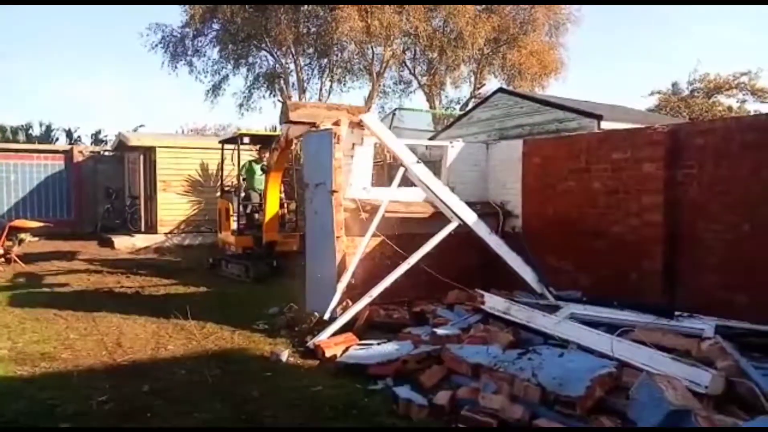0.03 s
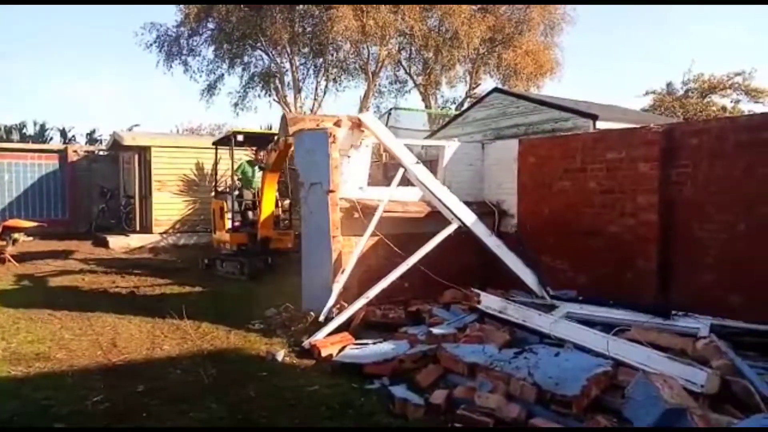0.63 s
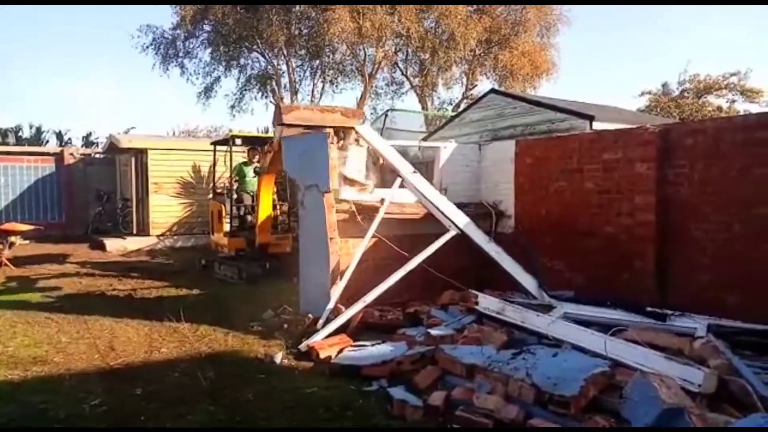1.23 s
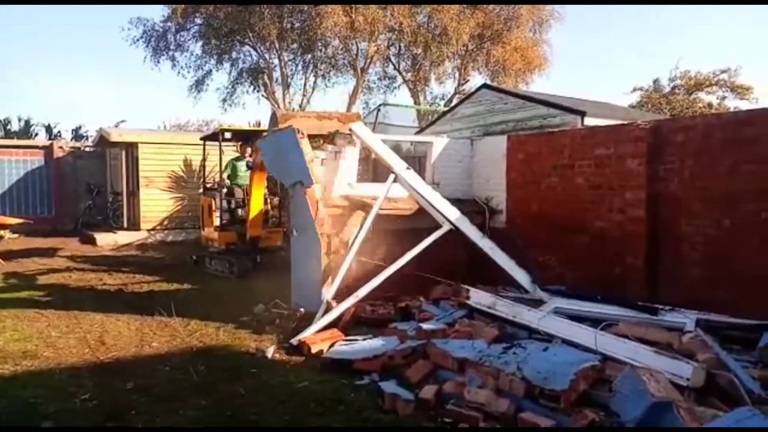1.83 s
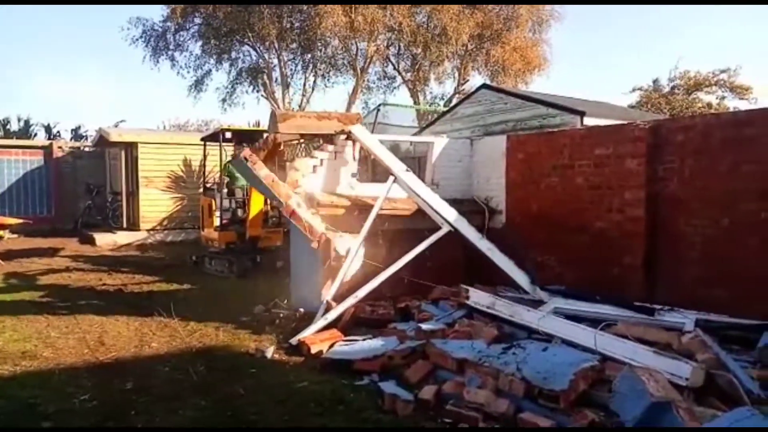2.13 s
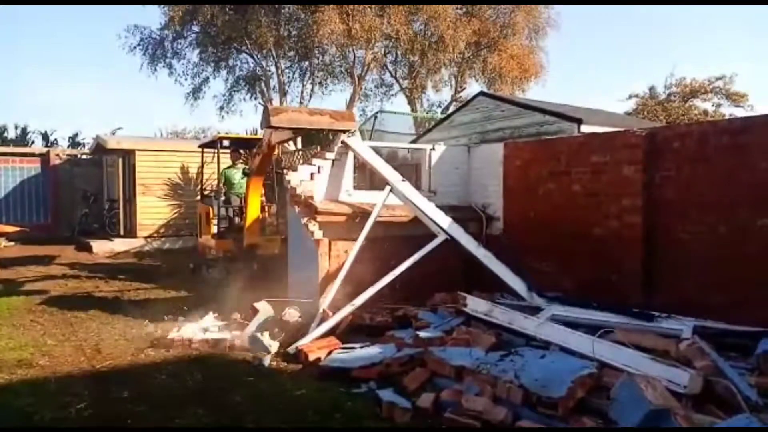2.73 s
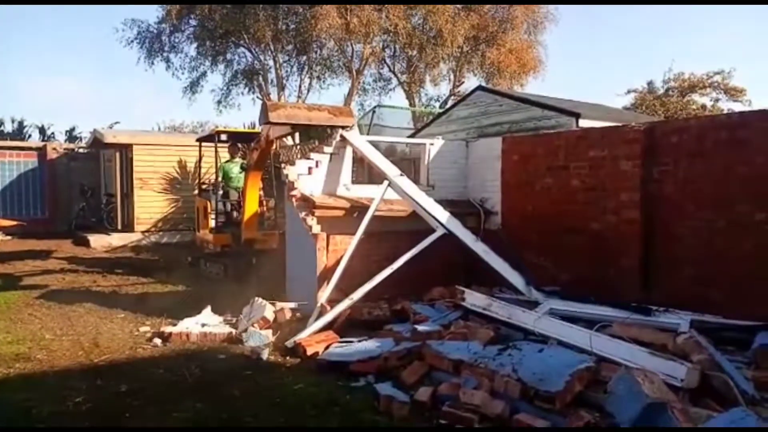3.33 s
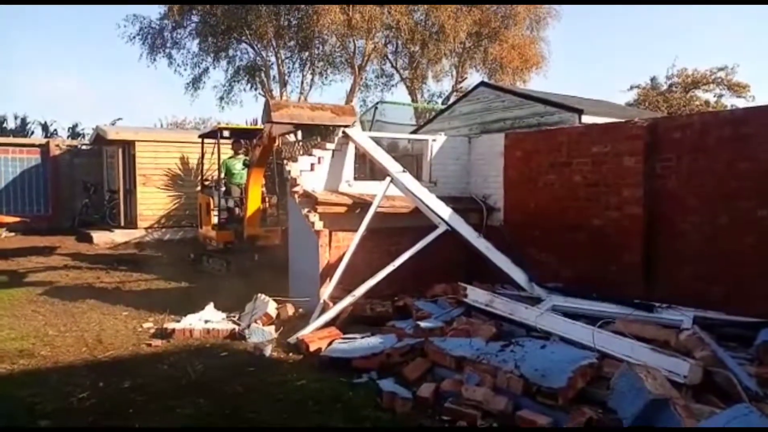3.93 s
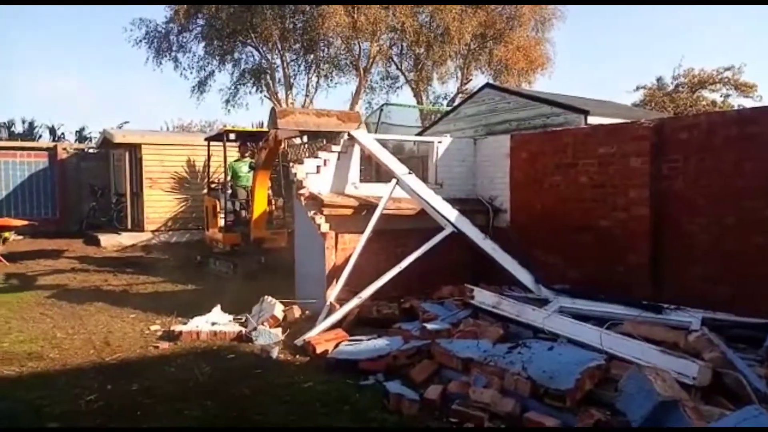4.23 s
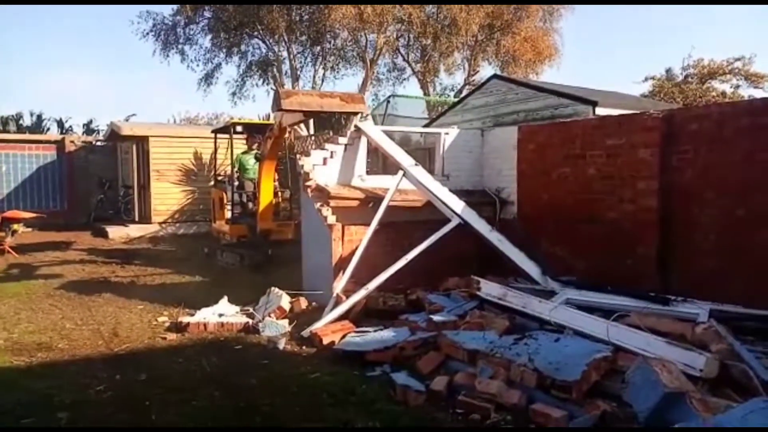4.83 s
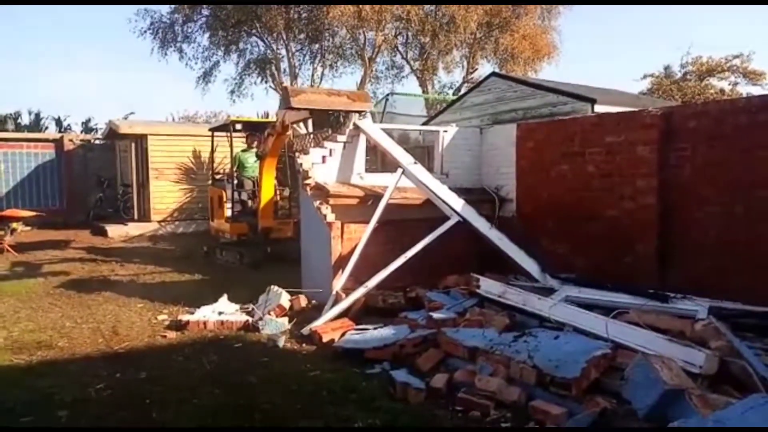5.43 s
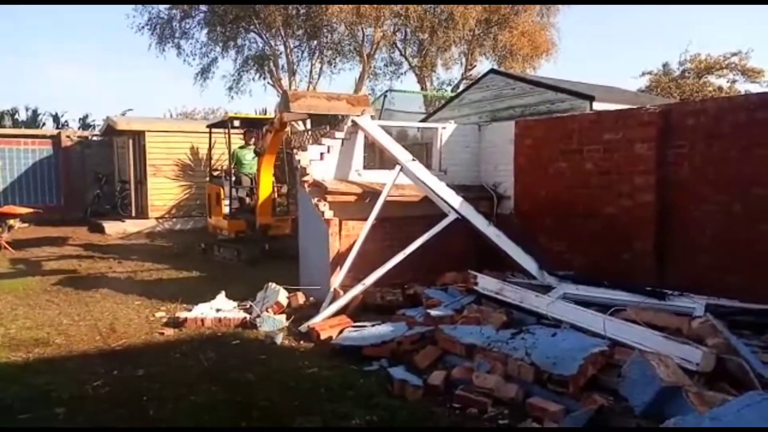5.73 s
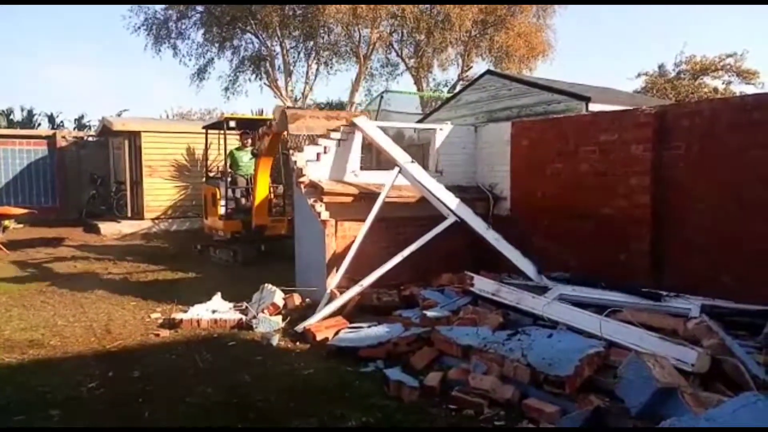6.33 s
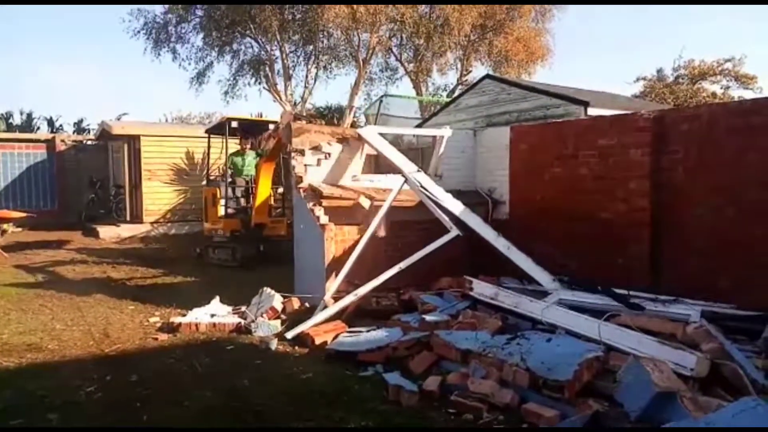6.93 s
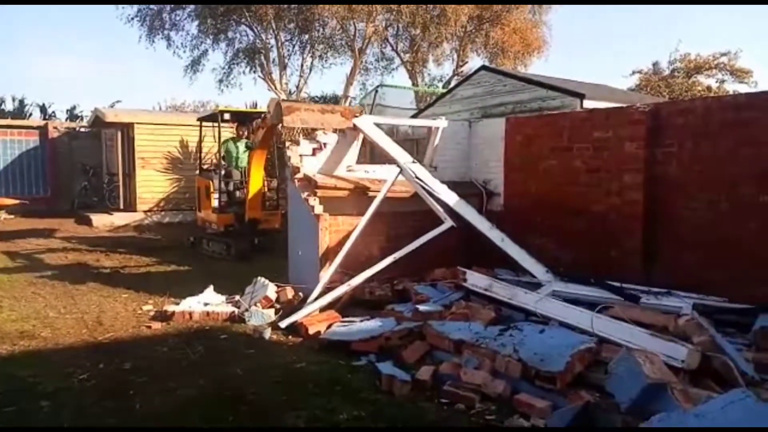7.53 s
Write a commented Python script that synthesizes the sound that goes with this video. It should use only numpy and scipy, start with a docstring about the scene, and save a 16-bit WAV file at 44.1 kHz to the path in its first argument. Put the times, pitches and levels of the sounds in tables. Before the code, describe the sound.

In a walled garden, masonry crunches and snaps under the blows of a small digger, its steel boom ringing faintly. Bricks clatter down and heavy pieces thump on the grass. For a few seconds only the chugging diesel remains, then a second round of knocks and falling brick begins. A phone picks it up from several metres off, stronger on the left, with a brief echo.

```python
"""A brick wall breaks under a mini digger's bucket, in a walled garden some metres from a phone.
The bucket knocks and grinds on the masonry and its steel boom rings; bricks crack, clink and tumble,
slabs thud on the lawn and mortar trickles down. The three-cylinder diesel chugs on through a pause,
slower and louder whenever the arm pulls; then the bucket bites again. Walls and sheds give a short
echo, and the phone's microphones hear it all louder on the left."""
import sys
import numpy as np
from scipy import signal
from scipy.fft import rfft, irfft
from scipy.io import wavfile
from scipy.ndimage import uniform_filter1d

SR = 44100
rng = np.random.default_rng(int(sys.argv[2]) if len(sys.argv) > 2 else 0)


def dump_mix(stems):
    """Bounce the given channels to the path in sys.argv[1] as a 16-bit WAV at rate SR."""
    frames = np.atleast_2d(stems).T  # one column per channel
    limited = np.clip(frames, -1, 1)  # hard clip at full scale
    pcm = np.round(limited * 32767).astype(np.int16)
    wavfile.write(sys.argv[1], SR, pcm)


N = 339570
TIME = np.arange(N) / SR


# bucket and slabs striking masonry, some metres off:
# (time [s], knock level [dB], thump level [dB], body level [dB], crunch level [dB], t60 [s])
BLOWS = [(0.113, -12, -39, -42, -44.5, 1), (0.486, -3, -24.5, -23, -25.5, 0.29),
         (1.024, -33, -61, -33, -38, 0.1), (1.143, -13.5, -25.5, -17, -23.5, 0.2),
         (1.402, -16, -23, -23, -22.5, 0.31), (1.507, -12, -32, -26, -26, 0.21),
         (1.715, -15, -28.5, -27.5, -27, 0.11), (1.807, -2.5, -29, -27, -33, 0.32),
         (2.333, -11, -27, -18.5, -32, 0.088), (2.389, -13, -31, -28.5, -33, 0.22),
         (2.420, -6, -24, -27.5, -46, 0.32), (2.595, -20, -28, -29, -25.5, 0.4),
         (2.635, -9.5, -23, -24.5, -37.5, 0.18), (3.541, -19, -50, -37.5, -57, 0.13),
         (6.426, -29, -54, -34.5, -54, 0.35), (6.451, -24, -32, -29, -24.5, 0.26),
         (6.49, -5, -31, -41, -28, 0.54), (6.633, -9.5, -35, -30, -43, 0.34),
         (6.743, -15.5, -36, -41, -34, 0.14), (6.858, -15, -50, -49, -41, 0.27),
         (6.987, -14, -30, -43, -32.5, 0.19), (7.059, -9, -47, -37, -33, 0.17),
         (7.255, -8, -33, -27.5, -31.5, 0.13), (7.402, -9, -31, -27.5, -47, 0.088),
         (7.68, -11, -29, -28, -32, 0.28)]
# bucket and wall resonances, low body and higher crunch: (frequency [Hz], width [Hz], level [dB])
BODY_MODES = [(322, 63, 5.5), (439, 27, 8), (593, 41, 9), (760, 74, 5), (832, 19, 0.5)]
CRUNCH_MODES = [(935, 61, 16.3), (1047, 180, 14.7), (1410, 320, 9.5), (1785, 280, 6.4), (2100, 480, 2)]

def bucket_blows(rise_s=0.0041, thump_db=-1, knock_db=-5, size=32768):
    """Each blow is one hard knock and a quick run of crushing contacts that shake wall and bucket."""
    out, t = np.zeros((2, N)), np.arange(size) / SR
    thump_modes = [(113.4, 40, 0), (217, 85, 0)]
    onset = SR // 25  # the first 40 ms set each level
    for s, knock, thump, body, crunch, t60 in BLOWS:
        knock_hz = 700 * 2 ** rng.uniform(-0.395, 0.34)
        add(out, s, undb(knock + knock_db) * chip(knock_hz, t60=0.1, ring=0.33))
        force = stereo_noise(size) * jagged(size, spread_db=2, per_s=440) * strike(t, t60, rise_s)
        for db, modes in ((thump + thump_db, thump_modes), (body, BODY_MODES), (crunch, CRUNCH_MODES)):
            shake = resonate(force, modes)
            add(out, s, undb(db) * shake / np.sqrt(np.mean(shake[:, :onset] ** 2)))
    return out


# the loudest bricks snapping in the wall: (time [s], level [dB], centre [Hz], half the crumbs' t60 [s])
CRACKS = [(0.050, -23, 4630, 0.011), (0.108, -21, 3000, 0.022), (0.115, -11, 2120, 0.015),
          (0.298, -23, 4400, 0.03), (0.3475, -20, 3800, 0.027), (0.509, -16.5, 3330, 0.031),
          (0.645, -17, 5960, 0.035), (0.778, -22, 2320, 0.031), (0.866, -19, 3110, 0.057),
          (0.928, -23, 5270, .03), (1.029, -17, 5370, 0.054), (1.320, -10.5, 5550, 0.051),
          (1.416, -19, 4450, 0.047), (1.486, -14, 6200, 0.097), (1.574, -17.5, 2900, 0.063),
          (1.604, -13.5, 4970, 0.04), (1.686, -23, 4550, 0.027), (1.778, -20.5, 2760, 0.2),
          (1.808, -15.5, 3000, 0.053), (1.848, -16, 3200, .03), (2.108, -14, 5130, 0.033),
          (2.159, -20, 2600, 0.018), (2.390, -18.5, 3120, 0.1), (2.511, -7.5, 6400, 0.012),
          (2.580, -18, 3800, .012), (2.595, -12.5, 4740, 0.098), (2.627, -10, 2220, 0.025),
          (2.708, -13, 3140, 0.0057), (2.742, -23, 4440, 0.029), (2.916, -19.5, 3170, 0.011),
          (2.958, -19.5, 3630, 0.042), (3.061, -26, 3500, 0.026), (3.148, -18.5, 6400, 0.014),
          (3.366, -20, 1880, 0.074), (3.472, -9.5, 2910, 0.011), (3.579, -18.5, 3840, 0.0091),
          (3.620, -24.5, 1510, 0.019), (3.776, -23, 3160, 0.051), (6.455, -14.5, 2200, 0.53),
          (6.516, -18, 2740, 0.15), (6.580, -6, 3060, 0.04), (6.602, -10, 3570, 0.037),
          (6.636, -13, 2630, 0.062), (6.783, -27, 4140, 0.026), (6.876, -32, 3500, 0.035),
          (6.977, -18, 2360, 0.074), (7.030, -14.5, 2950, 0.025), (7.055, -10.5, 4230, 0.035),
          (7.089, -16.5, 4450, 0.029), (7.221, -14.5, 3090, 0.046), (7.263, -13, 3450, 0.014),
          (7.393, -16.5, 2340, 0.094), (7.478, -23.5, 5600, 0.017), (7.638, -22.5, 4500, 0.022),
          (7.684, -18, 2140, 0.062)]

def brick_cracks(lesser, crumble_db=-6, snap_t60=0.012):
    """Each brick, loud or lesser, snaps and sheds a short spray of crumbs."""
    out = np.zeros((2, N))
    for s, db, hz, half_t60 in list(CRACKS) + lesser:
        add(out, s, undb(db) * chip(hz, snap_t60, ring=0.16, rise_s=0.00096))
        crumbs = chip(hz, 2 * half_t60, ring=0.33, rise_s=0.0049, size=8192)
        add(out, s, undb(db + crumble_db) * crumbs * jagged(crumbs.shape[1], spread_db=6, per_s=930))
    return out


def lesser_cracks(grit, count=130, per_s=14, over_grit_db=9.5, scatter_db=2, low_hz=1980, high_hz=6580):
    """Rows like CRACKS: bricks snap at random, following the strength of the running grit."""
    gap, size, pitch = rng.random((count, 3)).T
    times = np.cumsum(2 * gap / per_s)
    grit_db = 20 * np.log10(np.interp(times, TIME, grit) + 1e-9)
    levels = grit_db + over_grit_db + scatter_db * (2 * size - 1)
    centres = low_hz * (high_hz / low_hz) ** pitch
    return [(s, db, hz, 0.015) for s, db, hz in zip(times, levels, centres)]


# whole bricks landing on the heap; the first row is a knock already dying away as the scene opens: (time [s],
# level [dB], pitch [Hz], t60 [s])
LANDINGS = [(0.0, -15, 602, 0.03), (0.750, -25, 567, 0.08), (1.126, -42, 604, 0.056),
            (1.195, -41, 446, 0.3), (1.445, -21, 846, 0.082), (1.470, -20.5, 440, 0.055),
            (1.507, -14, 447, 0.054), (1.606, -19.5, 638, 0.08), (1.842, -26, 780, 0.22),
            (1.900, -17, 658, 0.11), (2.023, -25, 757, 0.12), (2.157, -20.5, 934, 0.043),
            (2.205, -20, 632, 0.047), (2.234, -23, 481, 0.21), (2.272, -23.5, 634, 0.13),
            (2.334, -24, 572, 0.15), (2.428, -14, 580, 0.062), (2.516, -25, 703, .06),
            (2.594, -14, 560, 0.05), (2.675, -24, 520, 0.057), (2.708, -23.5, 427, .06),
            (2.740, -27, 483, .05), (2.785, -22, 720, 0.051), (2.940, -22, 440, 0.042),
            (3.290, -38, 583, 0.099), (6.428, -24, 490, 0.081), (6.458, -31, 570, .07),
            (6.492, -25, 970, 0.077), (6.530, -28, 527, 0.083), (6.645, -35, 544, 0.088),
            (6.748, -30, 585, 0.076), (7.060, -21, 624, 0.07), (7.100, -26, 700, 0.066),
            (7.158, -30, 400, .06), (7.256, -22, 694, 0.054), (7.268, -21, 388, 0.11),
            (7.310, -24.5, 300, 0.068), (7.404, -19, 274, 0.053), (7.412, -24.5, 688, 0.2)]
# modes of a brick on the hollow heap: (frequency [ratio to pitch], level [dB])
BRICK_MODES = [(.68, -13.5), (0.998, 0), (1.268, -5.5), (1.9, -11)]

def tumbling_bricks(rock_s=0.012, rock_db=-2.5, scuff_db=-9, rise_s=0.0013, size=16384):
    """A brick lands on one edge and rocks onto another; each contact rings and scuffs the mortar."""
    out, t = np.zeros((2, N)), np.arange(size) / SR
    for s, db, hz, t60 in LANDINGS:
        rock_delay = rock_s * 2 ** rng.uniform(-0.497, 0.514)
        for delay, contact_db in ((0, 0), (rock_delay, rock_db)):
            detunes = rng.uniform(0.93, 1.07, len(BRICK_MODES))
            ring = sum(undb(mode_db) * np.sin(2 * np.pi * hz * ratio * detune * t)
                       for (ratio, mode_db), detune in zip(BRICK_MODES, detunes))
            scuff = undb(scuff_db) * noise_band(size, hz, width_hz=2 * hz)
            add(out, s + delay, undb(db + contact_db) * (ring + scuff) * strike(t, t60, rise_s))
    return out


# clinks of loose brick and steel, thuds on the lawn: (time [s], level [dB], pitch [Hz], t60 [s])
CLINKS = [(0.349, -27, 3430, 0.23), (0.349, -22, 3570, 0.067), (0.349, -14, 9640, 0.041),
          (1.670, -24, 4700, .05), (1.675, -20, 643, 0.11), (1.716, -15.5, 1650, 0.032),
          (1.716, -10.5, 1405, 0.02), (1.779, -24, 3100, 0.19), (1.783, -19, 2250, 0.055),
          (1.822, -12, 1596, 0.027), (2.050, -26, 4520, 0.059), (2.165, -24, 3100, 0.062),
          (2.498, -10, 660, 0.031), (2.498, -16, 980, 0.028), (2.707, -15, 2680, 0.023),
          (2.707, -14, 3020, .025), (2.848, -17, 1069, 0.068), (3.008, -12.5, 650, 0.03),
          (3.147, -21, 6200, 0.038), (3.484, -25.5, 1040, 0.067), (3.484, -31, 4130, 0.12),
          (6.607, -19, 1124, 0.055), (7.056, -18, 4440, 0.03), (7.078, -22, 4320, 0.041),
          (7.089, -23, 6260, 0.028), (7.254, -8.5, 1310, 0.015), (7.314, -22, 2105, 0.071),
          (7.478, -23, 6400, 0.026)]
THUDS = [(0.600, -25, 100, 0.085), (1.146, -22, 203.6, 0.7), (1.399, -13.5, 160, 0.18),
         (1.455, -14, 168, 0.084), (1.530, -22, 102, 0.21), (2.200, -23, 133.5, 0.25),
         (2.410, -14.5, 136, 0.14), (2.461, -7.5, 110, 0.096), (2.665, -18, 150, .05),
         (2.694, 1, 152, 0.046), (2.735, -19, 185, 0.062), (2.778, -21, 182, .08), (2.945, -19, 151, 0.14),
         (3.010, -16, 275, 0.048), (3.112, -20, 117, 0.1), (6.555, -22, 158, 0.094)]

def struck_pieces(rows, rough, rise_s, size=16384):
    """A struck piece swings at its own pitch and dies away, blurred by nearby modes."""
    out, t = np.zeros((2, N)), np.arange(size) / SR
    for s, db, hz, t60 in rows:
        tone = np.sin(2 * np.pi * hz * t)
        blur = rough * noise_band(size, hz, width_hz=hz / 2)
        add(out, s, undb(db) * (tone + blur) * strike(t, t60, rise_s))
    return out


# the highest-pitched brick snaps in the wall: (time [s], level [dB], t60 [s])
HIGH_SNAPS = [(0.486, -18, 0.028), (0.865, -22, .03), (1.283, -25, .015), (1.32, -11, 0.05),
              (1.691, -9, 0.0084), (1.963, -22, .02), (2.513, -6, 0.028), (2.543, -4.5, .025),
              (2.672, -7, 0.01), (2.68, -10, .015), (2.692, -13, .02), (6.58, -7, 0.06), (6.601, -6, 0.048),
              (6.783, -19, .04), (6.983, -17, 0.11), (7.148, -14, .03), (7.393, -29, .04),
              (7.411, -15, .06), (7.544, -22, .03)]

def high_snaps():
    """Bricks snap with a very short, bright, high tick, each at a pitch of its own."""
    out = np.zeros((2, N))
    for s, db, t60 in HIGH_SNAPS:
        add(out, s, undb(db) * chip(rng.uniform(10000, 13000), t60, ring=0.2, rise_s=0.00015))
    return out


# stretches of wall giving way:
# (start [s], length [s], grit level [dB], lump level [dB], rumble level [dB])
SLIDES = [(-.03, 0.038, -28, -36, -39), (0.276, 0.034, -33, -35.5, -38), (0.53, 0.16, -32, -33, -30),
          (0.777, 0.32, -37, -39, -39), (1.231, 0.51, -38, -35.5, -33), (1.386, 0.16, -30, -35, -25),
          (1.753, 0.12, -29, -31.5, -30), (1.953, 0.061, -28.5, -33, -29.5), (2.078, 0.22, -30, -33, -32.5),
          (2.388, 0.13, -28.5, -37, -34), (2.575, 0.049, -26.5, -46, -47), (2.685, 0.13, -33.5, -38.5, -25),
          (2.881, 0.23, -37, -38, -33), (3.468, 0.038, -40, -37.5, -39), (6.419, 0.12, -36.5, -39, -39),
          (6.563, 0.04, -27.5, -33, -52), (6.62, 0.16, -36.5, -36.5, -34.5),
          (6.959, 0.22, -33.5, -35.5, -36), (7.219, 0.096, -31.5, -39, -31.5),
          (7.393, 0.51, -38.5, -50, -43)]

def wall_slides(attack_s=0.017, grit_t60=0.85, lumps_t60=0.7, rumble_t60=0.75):
    """Gains of grit, lumps and rumble: slides swell, hold and trickle out, adding in power."""
    power = np.zeros((3, N))
    for s, length, *levels in SLIDES:
        swell = np.clip((TIME - s) / attack_s, 0, 1)
        since_end = np.maximum(TIME - s - length, 0)
        for layer, db, t60 in zip(power, levels, (grit_t60, lumps_t60, rumble_t60)):
            layer += (undb(db) * swell * fade(since_end, t60)) ** 2
    return np.sqrt(power)


# tone of the debris at the foot of the wall: (frequency [Hz], level [dB])
GRIT_SPECTRUM = [(900, 9), (1800, 6), (3000, 3), (6500, 1), (11000, 10), (15000, 5.5)]
LUMP_SPECTRUM = [(150, -22.5), (280, 9), (385, -6), (435, -6), (500, 2), (590, 3), (800, -1.5), (880, -4.5),
                 (1000, 0.5), (1500, -1), (2200, -3.5), (4000, -28)]
RUMBLE_SPECTRUM = [(25, -50), (55, -11), (100, -7.5), (180, -6.5), (300, -12), (600, -33)]

def debris(grit_gain, lumps_gain, rumble_gain):
    """Mortar grit trickles, lumps grind and tumble, the ground rumbles beneath."""
    grit = shower(1900, 9000, t60=0.027, spread_db=2.6, count=6000)
    lumps = shower(425.3, 1887, t60=0.033, spread_db=1, count=1300)
    return (undb(-1) * grit_gain * unit(colour(grit, GRIT_SPECTRUM))
            + undb(1) * lumps_gain * unit(colour(lumps, LUMP_SPECTRUM))
            + undb(-2) * rumble_gain * unit(colour(stereo_noise(N), RUMBLE_SPECTRUM)))


def shower(low_hz, high_hz, t60, spread_db, count, kinds=160):
    """Fragments of many pitches land at random; small ones are common, big ones rare."""
    pieces = [chip(hz, t60 * 2 ** rng.uniform(-1, 1), ring=1.5)
              for hz in np.geomspace(low_hz, high_hz, kinds)]
    out = np.zeros((2, N))
    for when, which, smallness in rng.random((count, 3)):
        size_db = -spread_db * np.log(smallness + 0.015)
        add(out, when * N / SR, undb(size_db) * pieces[int(which * kinds)])
    return out


# blows that jar the digger's boom: (time [s], level [dB])
BOOM_JARS = [(0.489, -24), (1.402, -36), (1.807, -37), (2.596, -38), (6.856, -40), (7.254, -40)]
# modes of the steel boom: (frequency [Hz], level [dB], t60 [s])
BOOM_MODES = [(433, -7, .45), (508, -1, 1.35), (590, 0, .4), (807, -10, .6), (931, -11, .8), (1048, -4, .5)]

def steel_boom(size=32768):
    """A hard blow leaves the steel boom ringing; each tone wavers in strength, beating 5 to 9 times a second."""
    out, t = np.zeros((2, N)), np.arange(size) / SR
    for s, jar_db in BOOM_JARS:
        for hz, db, t60 in BOOM_MODES:
            beat = 1 + 0.25 * np.sin(2 * np.pi * (rng.uniform(5, 9) * t + rng.random()))
            add(out, s, undb(jar_db + db) * beat * fade(t, t60) * np.sin(2 * np.pi * hz * t))
    return out


# the arm working against the wall: (start [s], end [s], load [0-1])
ARM_PULLS = [(0, 2, 0.66), (4.53, 4.72, 1), (4.72, 5.22, .76), (6.45, 7.55, 0.73)]

def engine_load(governor_s=0.08):
    """Load 0-1: the governor follows each pull of the arm with a lag."""
    settle = lambda s: 1 - np.exp(-np.maximum(TIME - s, 0) / governor_s)
    return sum(load * (settle(start) - settle(end)) for start, end, load in ARM_PULLS)


# resonances of silencer, injector pipes and loose covers: (frequency [Hz], width [Hz], level [dB])
SILENCER_MODES = [(45.6, 7.8, -10), (85.5, 8.4, -10.5), (133.5, 35.6, 0.5), (169, 21.6, 4.5),
                  (242, 18, -3.5), (342, 17.4, -7), (602, 10, -12.5), (696, 31, -16.5)]
INJECTOR_MODES = [(2860, 210, 6.5), (5330, 290, 11), (6150, 500, 4.5)]
COVER_MODES = [(686, 55, 1), (977, 22, -2.5), (1720, 34, 1), (2735, 110, -2.5)]
# fan rush and block clatter, some metres off: (frequency [Hz], level [dB])
CLATTER_SPECTRUM = [(26, 4), (55, 2), (110, 17), (200, 18), (480, 7.5), (780, 10.5), (1100, 10.5),
                    (1700, 5.5), (3000, 5), (4400, 3.5), (5500, 6), (6700, 3), (9000, -1), (15000, -14)]
# the three unequal injectors, one a cylinder: (level [dB])
INJECTOR_DB = [1.5, 0, -3]

def diesel(idle_hz=43, droop_hz=3.2, idle_db=-43, load_db=4.5, gas_db=-7):
    """Three cylinders fire into the silencer; each firing knocks, ticks and buzzes the covers."""
    load = engine_load()
    # the governor hunts a little, so speed and strength waver
    firing_hz = (idle_hz - droop_hz * load) * (1 + 0.005 * drift(hold_s=0.09))
    exhaust_db = idle_db + load_db * load + 0.8 * drift(hold_s=0.06)
    cycles = np.cumsum(firing_hz) / SR
    firings = np.flatnonzero(np.diff(np.floor(cycles)))
    lateness, strength = rng.uniform(-1, 1, (len(firings), 2)).T
    firings = np.clip(firings + (0.0002 * SR * lateness).astype(int), 0, N - 1)
    cylinder_db = np.resize([0.8, -0.7, 0], len(firings))
    pulses = np.zeros(N)
    pulses[firings] = undb(cylinder_db + 1.1 * strength)
    pulses = unit(pulses)
    # turbulent gas rumbles in the silencer too; under load the firings stand clear of it
    gas = rng.standard_normal(N) * undb(gas_db - load_db * load)
    exhaust = unit(colour(resonate(pulses + gas, SILENCER_MODES), [(700, 8), (1500, -41)]))
    # each firing's vibration dies within its cycle
    knock_gate = np.exp(-(cycles % 1) / 0.3)
    tick_gate = np.exp(-(cycles % 1) / 0.17)
    knock = colour(stereo_noise(N), [(1000, -10), (5000, -19)]) * knock_gate
    fan = stereo_noise(N)
    clatter = unit(colour(fan + undb(-2) * knock, CLATTER_SPECTRUM))
    injector_gain = undb(INJECTOR_DB)[cycles.astype(int) % len(INJECTOR_DB)]
    spray = unit(stereo_noise(N) * tick_gate)
    ticks = unit(resonate(injector_gain * (pulses + spray), INJECTOR_MODES))
    covers = unit(resonate(pulses + unit(stereo_noise(N) * knock_gate), COVER_MODES))
    return undb(exhaust_db) * exhaust + undb(-42.5) * clatter + undb(-53.5) * ticks + undb(-58) * covers


def garden_echo(x, echo_db, t60=0.45, gap_s=0.012, size=32768):
    """The direct sound reaches the phone first, then scattered echoes off walls, sheds and fences."""
    t = np.arange(size) / SR
    envelope = fade(t, t60) * (t > gap_s)
    tail = colour(stereo_noise(size) * envelope, [(200, 2.5), (2000, 3), (9000, -1.5)])
    tail /= np.sqrt(np.sum(envelope ** 2))
    return x + undb(echo_db) * signal.oaconvolve(x, tail, axes=1)[:, :N]


def chip(hz, t60, ring, rise_s=0.00014, size=4096):
    """One brittle contact, peak 1: a broad burst and three short modes set by the piece's shape."""
    burst = stereo_noise(size) * strike(np.arange(size) / SR, t60, rise_s)
    ratios = np.array([1, rng.uniform(1.15, 1.5), rng.uniform(1.6, 2.3)])
    modes = [(f, f / 45, 0) for f in hz * ratios]
    x = unit(resonate(burst, [(hz, hz * 0.73, 0)])) + ring * unit(resonate(burst, modes))
    return x / np.abs(x).max()


def stereo_noise(size, shared_hz=800):
    """Noise at the two microphones: the bass is shared, the treble unrelated."""
    left, other = rfft(rng.standard_normal((2, size)))
    hz = np.arange(len(left)) * SR / size
    likeness = 1 / (1 + (hz / shared_hz) ** 4)
    right = likeness * left + np.sqrt(1 - likeness ** 2) * other
    return irfft(np.array([left, right]), size)


def noise_band(size, hz, width_hz):
    """Noise passed twice through one resonance, rms 1."""
    mode = [(hz, width_hz, 0)]
    return unit(resonate(resonate(stereo_noise(size), mode), mode))


def resonate(x, modes):
    """Parallel resonances (frequency [Hz], width [Hz], level [dB]), neighbours in opposite phase."""
    out = 0
    for k, (hz, width, db) in enumerate(modes):
        b, a = signal.iirpeak(min(hz, SR / 3), hz / min(width, SR / 4), fs=SR)
        out += (-1) ** k * undb(db) * signal.lfilter(b, a, x)
    return out


def colour(x, points, size=4096):
    """Causal filter that follows a spectrum of (frequency [Hz], level [dB]) points."""
    hz, db = np.transpose(points)
    bins = np.maximum(np.arange(size // 2 + 1) * SR / size, 1)
    gain = undb(np.interp(np.log(bins), np.log(hz), db))
    cepstrum = irfft(np.log(gain))
    cepstrum[1:size // 2] *= 2  # fold to minimum phase
    cepstrum[size // 2 + 1:] = 0
    impulse = irfft(np.exp(rfft(cepstrum)))
    return signal.oaconvolve(np.atleast_2d(x), impulse[None], axes=1)[:, :x.shape[-1]]


def jagged(size, spread_db, per_s):
    """A gain that jumps from one small contact to the next."""
    contact = (np.arange(size) * per_s / SR).astype(int)
    return undb(spread_db * np.clip(rng.standard_normal(size), -2, 2)[contact])


def drift(hold_s):
    """A smooth random drift with rms near 1."""
    hold = int(hold_s * SR)
    steps = np.repeat(rng.standard_normal(N // hold + 1), hold)
    return unit(uniform_filter1d(steps, hold))[:N]


def strike(t, t60, rise_s):
    """Envelope of an impact: a quick rise, then a decay."""
    return fade(t, t60) * (1 - np.exp(-t / rise_s))


def fade(t, t60):
    """Exponential decay, 60 dB in t60 seconds."""
    return np.exp(-np.log(1000) * t / max(t60, 1 / SR))


def add(out, s, x):
    """Mix a sound in at s seconds."""
    i = int(np.clip(s * SR, 0, N - 1))
    out[:, i:i + x.shape[-1]] += x[..., :N - i]


def unit(x):
    """Scale to rms 1."""
    return x / np.sqrt(np.mean(x ** 2))


def undb(db):
    """Decibels to gain."""
    return 10 ** (np.asarray(db) / 20)


def scene():
    """The breaking wall over the digger's engine, heard from some metres across the garden."""
    clinks = struck_pieces(CLINKS, rough=0.35, rise_s=0.0008)
    thuds = struck_pieces(THUDS, rough=0.5, rise_s=0.003)
    grit_gain, lumps_gain, rumble_gain = wall_slides()
    cracks = brick_cracks(lesser_cracks(grit_gain))
    background = diesel() + debris(grit_gain, lumps_gain, rumble_gain) + steel_boom()
    impacts = bucket_blows() + tumbling_bricks() + cracks + high_snaps() + clinks
    return garden_echo(impacts, echo_db=-10) + garden_echo(thuds, echo_db=-23.5) + background


# response of the phone's two microphone ports: (frequency [Hz], level [dB])
LEFT_PORT = [(100, 4), (1000, 1), (4000, 3), (6800, 7), (8200, -9), (10000, -12), (11000, -18),
             (13000, -19), (14000, -19), (15000, -5), (16000, -10)]
RIGHT_PORT = [(100, -5), (600, -8.5), (1500, -9), (3000, -8.5), (6500, -11), (9000, -7), (11000, -21.5),
              (13000, -15.5), (15500, -36)]

def record(dry):
    """The phone's right port is much weaker than its left; both dull the top and round loud peaks."""
    ceiling, top_hz = 0.8, 15800
    ports = np.vstack([colour(dry[0], LEFT_PORT), colour(dry[1], RIGHT_PORT)])
    rounded = ports / (1 + (ports / ceiling) ** 4) ** 0.25
    lowpass = signal.ellip(10, 0.2, 80, top_hz, fs=SR, output="sos")
    return signal.sosfilt(lowpass, rounded)


dry = scene()
out = record(dry)
dump_mix(out)
```